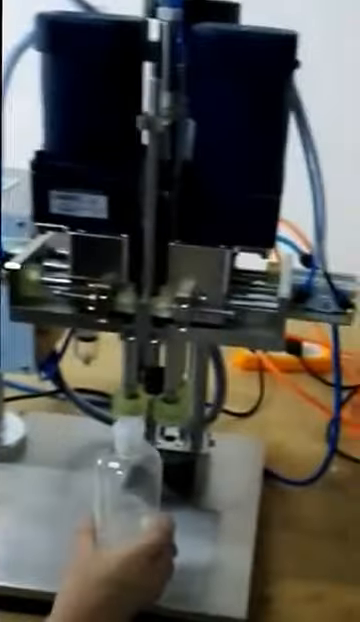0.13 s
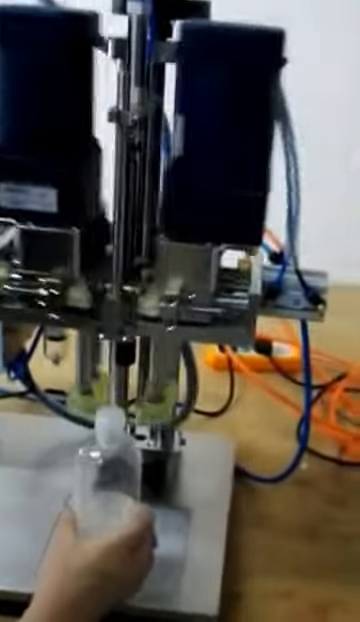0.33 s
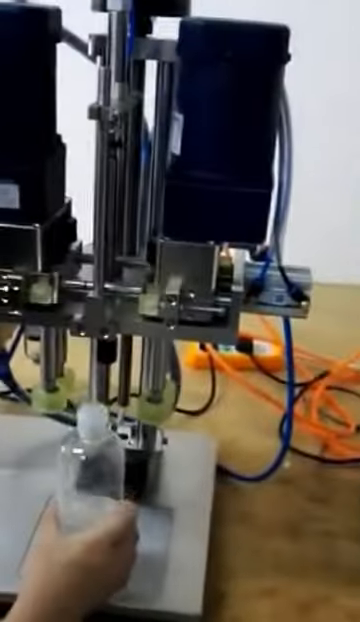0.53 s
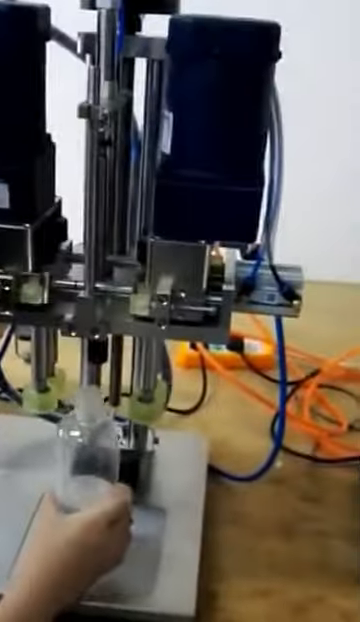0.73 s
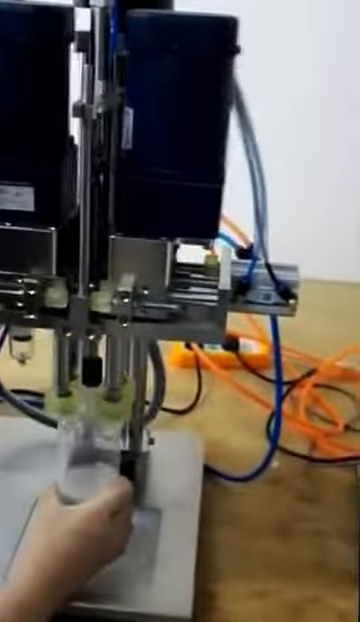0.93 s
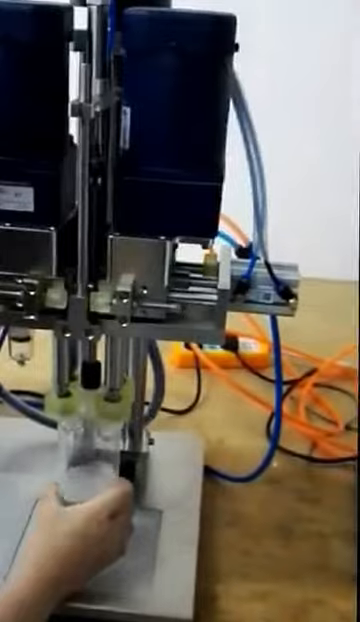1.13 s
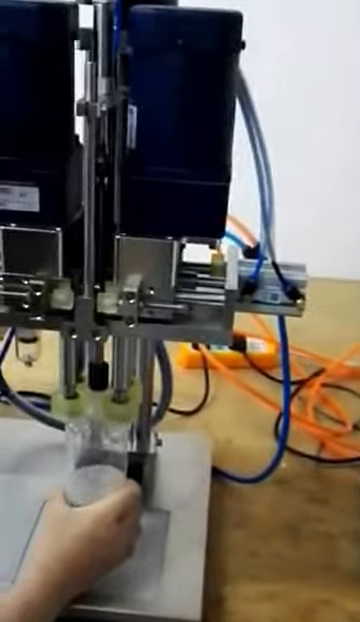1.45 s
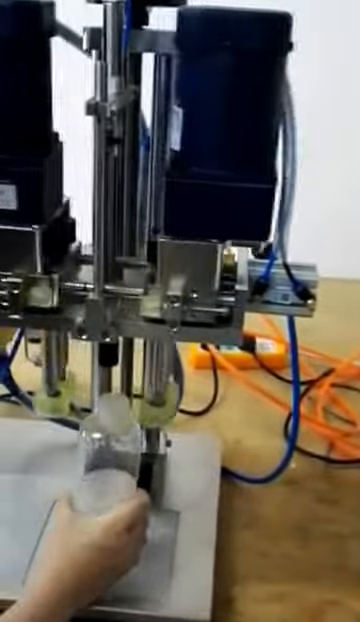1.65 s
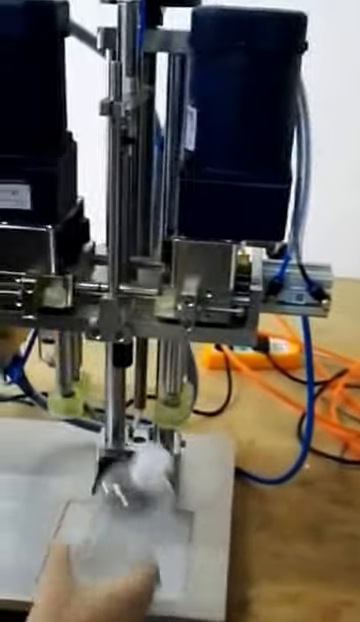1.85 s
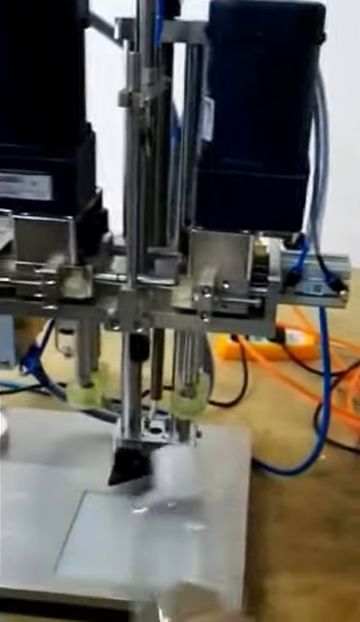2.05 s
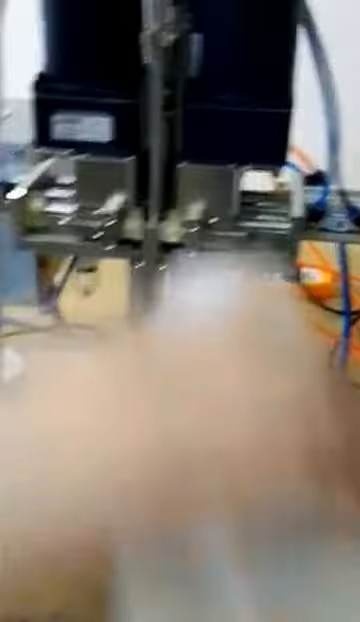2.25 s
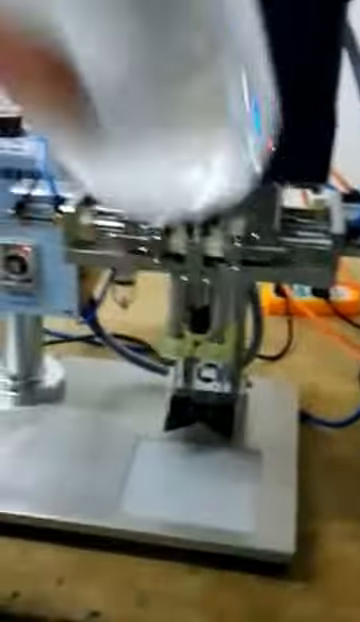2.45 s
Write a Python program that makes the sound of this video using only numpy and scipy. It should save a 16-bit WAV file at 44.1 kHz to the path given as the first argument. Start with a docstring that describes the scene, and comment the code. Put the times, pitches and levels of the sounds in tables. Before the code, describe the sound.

A pneumatic capper fires abrupt air bursts and rattling metal knocks, pauses briefly, clacks hardest around the middle, then hisses and knocks again several times; low workshop noise and short room echo behind, close microphones.

```python
"""Bursts of escaping air lead a benchtop pneumatic capper running one cycle in a hard-walled workshop.
Each burst is shaped fizz and rush noise; cylinder knocks mix noise blows with ringing housing and steel
modes, and shake the bench into low booms. Small parts click as brief noise, and slides ring as tone pairs.
Behind them lie noise din and rattle, deep rumble and thin motor tones. The left microphone is muffled
and slightly late."""
import sys
import numpy as np
from scipy import signal
from scipy.fft import rfft, irfft
from scipy.io import wavfile
from scipy.ndimage import uniform_filter1d

SR = 44100
rng = np.random.default_rng(int(sys.argv[2]) if len(sys.argv) > 2 else 0)


def generate_wav(signal):
    """Clip the signal to [-1, 1] and save it as 16-bit WAV at the path in sys.argv[1]."""
    frames = np.transpose(np.atleast_2d(signal))
    scaled = np.clip(frames, -1, 1) * 32767
    pcm = np.round(scaled).astype(np.int16)
    wavfile.write(sys.argv[1], SR, pcm)


N = 114660  # samples

# All levels are those of a layer before the mix; spectra only set the balance within a noise.
# Motor tones: [f/Hz, level/dB]
HUM_TONES = [(1500, -65), (1658, -60)]
HUM_WANDER, HUM_SWELL_DB = 0.006, 2.5  # rms pitch drift as a fraction, rms level drift

# Deep rumble over time: [t/s, level/dB]
RUMBLE_LEVEL = [(0, -69), (.3, -83), (.48, -53), (.65, -50.5), (.77, -61), (1, -64), (1.13, -45),
                (1.25, -45), (1.38, -52.5), (1.77, -70), (1.85, -46.5), (1.93, -74), (2.03, -46.5),
                (2.25, -62), (2.42, -51), (2.6, -71)]
# Rumble spectrum: [f/Hz, level/dB]
RUMBLE_SPECTRUM = [(15, -41), (30, -30), (45, -6), (67, 3.5), (85, -21), (130, 1), (400, -46), (4000, -90)]

# Workshop din over time: [t/s, level/dB]
DIN_LEVEL = [(0, -36.5), (.05, -45.5), (.12, -51), (.2, -41), (.55, -37), (.66, -41), (0.822, -46),
             (1, -34.5), (1.36, -36.5), (1.501, -41), (1.8, -39), (2.098, -39.5), (2.42, -35),
             (2.52, -41.5), (2.6, -39.5)]
# Din spectrum: [f/Hz, level/dB]
DIN_SPECTRUM = [(20, -20), (40, -27), (65, -64), (88, -10), (130, -8), (180, -3), (225, 4.5), (280, 1),
                (360, -0.5), (580, -1.5), (800, 1), (1150, -4.5), (1600, -1), (2300, -1.5), (3000, -4.5),
                (3600, -7), (4100, -12), (5000, -11), (6500, -20), (9000, -12), (12000, -29)]
RATTLES_PER_S, RATTLE_DB, RATTLE_SPREAD_DB = 70, -9.5, 0.5  # rattle level is relative to the din noise

# Workshop echo decay: [f/Hz, t60/s]
ROOM_DECAY = [(100, 0.57), (300, 0.26), (900, 0.34), (2000, 0.45), (8000, 0.41), (12000, 0.23)]
AIR_WET_DB, KNOCK_WET_DB, CLICK_WET_DB = -3.5, -5, -10  # echo sends

# Cylinder knocks: [t/s, bench thud level/dB, clonk level/dB, clonk centre f/Hz,
#                   housing ring length factor, steel clank level/dB]
CYLINDER_KNOCKS = [(0.206, -43.5, -26, 716, 0.39, -32.5), (.301, -32.5, -29.5, 910, 0.65, -23),
                   (.333, -35, -29.5, 760, 0.63, -33), (.352, -32.5, -35, 780, 1.2, -19),
                   (0.428, -31.5, -26, 930, 0.7, -29), (.903, -47, -31.5, 784, 0.74, -26.5),
                   (1.037, -41, -23.5, 660, 0.38, -29.5), (1.114, -30, -16, 810, 0.79, -18),
                   (1.142, -41, -30, 860, 0.53, -26.5), (1.162, -24, -28, 760, 0.79, -22),
                   (1.2, -28.5, -28.5, 780, 0.58, -27), (1.567, -44, -23.5, 880, 0.41, -28.5),
                   (1.658, -33.5, -28.5, 920, 1.2, -23.5), (1.866, -34.5, -22, 704, 0.34, -27.5),
                   (1.963, -40, -28.5, 784, 1.56, -18.5), (2.017, -27, -25, 790, 0.45, -16),
                   (2.145, -76, -25.5, 765, 0.38, -41), (2.249, -42.5, -33, 865, 1.4, -26),
                   (2.309, -31, -42, 800, 0.75, -30)]
# Bench modes: [f/Hz, level/dB, t60/s]
BENCH_MODES = [(128, -16, 0.88), (216.5, -2.5, 0.68), (271.4, 0, 0.63), (403, -16, 0.77)]
# Bench thud spectrum: [f/Hz, level/dB]
THUD_SPECTRUM = [(25, -48), (65, -28), (88, -23), (125, 3.5), (175, -5), (220, 7.5), (280, -2.5),
                 (350, -13.5), (600, -7), (1200, -18), (8000, -91)]
THUD_T60, THUD_RISE_S, BENCH_RING_DB, BENCH_NOISE_DB = 0.63, 0.0049, -7, -6.5
# Cylinder housing modes: [f/Hz, level/dB, t60/s]
HOUSING_MODES = [(464, -13, 0.16), (656.6, -2.5, 0.11), (726, -3, 0.15), (817, 1, 0.074), (867, 0, 0.11),
                 (919.6, -1.5, 0.13), (990, 2.5, 0.14), (1230, -16, .09), (1330, 11, 0.17)]
# Hollow clonk spectrum: [f/Hz, level/dB]
CLONK_SPECTRUM = [(150, -51), (400, 3), (570, 9.5), (710, 0.5), (950, 12.5), (1100, 3.5), (1350, -8),
                  (1700, -4), (3000, -43), (12000, -50)]
CLONK_T60, CLONK_RISE_S, HOUSING_RING_DB = 0.12, 0.0021, 9
CLONK_WIDTH = 0.087  # log-frequency distance over which the housing modes lose 6 dB
# Steel frame and loose part modes: [f/Hz, level/dB, t60/s]
STEEL_MODES = [(1135, -0.5, 0.077), (1410, -0.5, 0.3), (1589, 3.5, 0.084), (1880, 4.5, 0.041),
               (3360, -4, 0.025)]
# Steel clank spectrum: [f/Hz, level/dB]
CLANK_SPECTRUM = [(150, -15), (600, -15), (1100, -8), (1450, 8), (1900, 6.5), (2500, 6.5), (3100, -7.5),
                  (5000, 0.5), (12000, -17)]
CLANK_T60, CLANK_RISE_S, CLANK_CHATTER_S, STEEL_RING_DB = 0.073, 0.00038, 0.015, -9.5

# Struck slides: [t/s, upper tone f/Hz, level/dB, t60/s]
SLIDE_HITS = [(0.205, 1237, -23.5, 0.064), (.352, 1863, -24, .14), (.428, 925, -38, 0.24),
              (.574, 1410, -36, 0.25), (1.66, 864, -34, .36), (1.774, 1390, -36, 0.31),
              (1.868, 1256, -28.5, 0.18)]
PAIR_RATIO, PAIR_DB, SLIDE_RISE_S = 0.72, -7.5, 0.0036  # second tone: pitch ratio and relative level

# Clicks of small parts: [t/s, level/dB, part resonance f/Hz]
PART_CLICKS = [(.351, -11.5, 5650), (.572, -27, 3480), (.769, -32.5, 1690), (.859, -28, 3450),
               (0.888, -22, 6500), (.981, -14.5, 2690), (1.061, -19, 2240), (1.152, -31, 1400),
               (1.178, -27, 1800), (1.224, -23, 1250), (1.336, -42, 1810), (1.774, -27, 1820),
               (2.016, -14, 4700), (2.139, -31, 4220), (2.365, -31.5, 2740), (2.435, -32, 2400)]
# Click spectrum: [f/Hz, level/dB]
CLICK_SPECTRUM = [(200, -41), (1200, -23), (1900, 4), (3000, 0.5), (4000, -3), (5500, -3.5), (8000, -3),
                  (12000, -7.5)]
CLICK_T60, PART_T60, PART_DB = 0.05, 0.074, -6
PART_WIDTH = 0.2  # the part's noise is 30 dB down at twice this fraction away from its resonance

# Air exhausts: [t/s, length/s, fizz level/dB, rush level/dB, level sag/(dB/s)]
AIR_EXHAUSTS = [(0.201, 0.12, -21, -26, 5), (0.329, 0.079, -16.5, -24.5, 55), (0.49, 0.078, -38, -37.5, 20),
                (0.868, 0.072, -53, -38.5, 30), (0.894, 0.16, -20, -24.5, 57), (1.044, 0.13, -20, -29, 15),
                (1.242, 0.07, -49, -61, 77), (1.521, 0.071, -45.5, -50, 11), (1.568, 0.1, -15.5, -26, 92),
                (1.684, 0.11, -34, -36.5, 19), (1.867, 0.091, -19, -25.5, -9), (1.98, 0.063, -22, -24, 7),
                (2.133, 0.072, -21, -28, 13), (2.215, 0.093, -24.5, -30, 76)]
# High fizz spectrum of the jet: [f/Hz, level/dB]
FIZZ_SPECTRUM = [(100, -56), (3000, -13.5), (6000, -13.5), (7300, -5), (8200, -0.5), (9100, 2),
                 (10000, 0.5), (10900, -3.5), (11700, -10.5), (13000, -31)]
# Broad rush spectrum of the jet: [f/Hz, level/dB]
RUSH_SPECTRUM = [(60, -25), (300, -11), (800, -4), (1500, 1.5), (2400, 2.5), (3000, 0), (3500, 3.5),
                 (4000, 8), (4800, -0.5), (6200, 4), (8000, 2.5), (13000, -12)]
VALVE_OPEN_S, VALVE_SHUT_S, FLUTTER = 0.012, 0.02, 0.048  # rise, closing time constant, rms flutter
# Colour that the frame gives to the escaping air: [f/Hz, gain/dB]
FRAME_COLOUR = [(3050, -1), (3500, 3), (3980, -9), (4400, 2.5), (6600, 1), (7250, -4), (7800, -0.5)]
TURBULENCE_DB = 1.8  # rms of the random patches
# First bounces of the air off nearby surfaces: [delay t/s, level/dB]
AIR_BOUNCES = [(.00085, -23.5), (.0023, -13), (.0047, -15)]

MUFFLE_HZ, LEFT_LATE_S = 310, 0.000522  # left microphone
EDGE_HZ = 11950  # upper band limit


def amp(db):
    """Turns decibels into gain."""
    return 10 ** (np.asarray(db) / 20)


def unit(x):
    """Scales a signal to rms 1."""
    return x / np.sqrt(np.mean(x ** 2) + 1e-20)


def read(points, hz):
    """Reads a table along a log-frequency axis."""
    f, value = np.transpose(points)
    return np.interp(np.log(hz + 1), np.log(f + 1), value)


def level_over_time(points):
    """Draws a gain curve through points of time and decibels."""
    return amp(np.interp(np.arange(N) / SR, *np.transpose(points)))


def seconds(length):
    """Time axis for a sound of this length in seconds."""
    return np.arange(int(length * SR)) / SR


def add(mix, start, sound):
    """Mixes a sound in at a start time in seconds, cut off where the mix ends."""
    part = mix[round(start * SR):][:len(sound)]
    part += sound[:len(part)]


def smooth_random(shape, size):
    """Slow random drift of rms 1, smoothed over a number of samples."""
    return unit(uniform_filter1d(rng.standard_normal(shape), size=size))


def noise(spectrum, size):
    """Random-phase noise of rms 1 with the given spectrum."""
    gain = amp(read(spectrum, np.fft.rfftfreq(size, 1 / SR)))
    phase = 2 * np.pi * rng.random(len(gain))
    return unit(irfft(gain * np.exp(1j * phase), size))


def fade(t, t60):
    """Exponential decay of 60 dB in t60."""
    return np.exp(-np.log(1000) * t / t60)


def ring(modes, t):
    """Dying sines of a struck object, scaled by their combined rms before decay."""
    out, power = np.zeros(len(t)), 0
    for k, (hz, db, t60) in enumerate(modes):
        sign = (-1) ** k  # neighbouring modes start in opposite directions
        out += sign * amp(db) * fade(t, t60) * np.sin(2 * np.pi * hz * t)
        power += amp(db) ** 2 / 2
    return out / np.sqrt(power)


def room(x):
    """The workshop's echo: a noise tail whose bands die at their own speeds."""
    hz, t, bands = signal.stft(rng.standard_normal(SR), SR, nperseg=256)
    t60 = read(ROOM_DECAY, hz)[:, None]
    tail = signal.istft(bands * fade(t, t60), SR, nperseg=256)[1]
    tail *= np.clip(np.arange(len(tail)) / SR / 0.0038, 0, 1) ** 2  # soft onset over 3.8 ms
    return signal.fftconvolve(x, tail / np.linalg.norm(tail))[:N]


def hum():
    """Thin motor tones that waver a little in pitch and level."""
    out = np.zeros(N)
    for hz, db in HUM_TONES:
        # each drift is scaled to rms 1 on its own
        wander, swell = smooth_drifts = np.array([smooth_random(N, 4000), smooth_random(N, 4000)])
        phase = 2 * np.pi * np.cumsum(hz * (1 + HUM_WANDER * wander)) / SR
        out += amp(db + HUM_SWELL_DB * swell) * np.sqrt(2) * np.sin(phase)
    return out


def rumble():
    """Low-frequency noise that swells and sinks slowly."""
    return level_over_time(RUMBLE_LEVEL) * noise(RUMBLE_SPECTRUM, N)


def rattle():
    """Loose steel parts are tapped at random, each tap exciting steel modes and clank noise."""
    struck = rng.random(N) < RATTLES_PER_S / SR
    taps = amp(RATTLE_SPREAD_DB * rng.standard_normal(N)) * struck
    t = seconds(0.2)
    tap_sound = ring(STEEL_MODES, t) + noise(CLANK_SPECTRUM, len(t)) * fade(t, CLICK_T60)
    return unit(signal.oaconvolve(taps, tap_sound)[:N])


def workshop():
    """A dull, uneven noise din of machinery with a light rattle in it."""
    uneven = amp(0.8 * smooth_random(N, 500))
    din = noise(DIN_SPECTRUM, N) + amp(RATTLE_DB) * rattle()
    return level_over_time(DIN_LEVEL) * uneven * din


def bench():
    """Every knock shakes the bench, which booms in its low modes with a dull noise thud."""
    out, t = np.zeros(N), seconds(1)
    rise = np.minimum(t / THUD_RISE_S, 1)
    for start, thud_db, *_ in CYLINDER_KNOCKS:
        thud = amp(BENCH_NOISE_DB) * noise(THUD_SPECTRUM, len(t)) * fade(t, THUD_T60)
        boom = amp(BENCH_RING_DB) * ring(BENCH_MODES, t)
        add(out, start, amp(thud_db) * (thud + boom) * rise)
    return out


def slides():
    """Struck slides ring on in two tones that die away together, the second one lower and softer."""
    out, t = np.zeros(N), seconds(0.5)
    rise = np.minimum(t / SLIDE_RISE_S, 1)
    for start, hz, db, t60 in SLIDE_HITS:
        pair = ring([(hz, 0, t60), (hz * PAIR_RATIO, PAIR_DB, t60)], t)
        add(out, start, amp(db) * pair * rise)
    return out


def clicks():
    """Sharp metal contacts: a noise click plus narrow noise at the resonance of the part hit."""
    out, t = np.zeros(N), seconds(0.1)
    stretch = 1 + 2 * PART_WIDTH
    for start, db, hz in PART_CLICKS:
        contact = noise(CLICK_SPECTRUM, len(t)) * fade(t, CLICK_T60)
        part = noise([(hz / stretch, -30), (hz, 0), (hz * stretch, -30)], len(t)) * fade(t, PART_T60)
        add(out, start, amp(db) * (contact + amp(PART_DB) * part))
    return out


def clonk(centre_hz, stretch, t):
    """A short hollow blow; where it lands decides which housing modes ring, and how long."""
    modes = []
    for hz, db, t60 in HOUSING_MODES:
        off_centre_db = 6 * abs(np.log(hz / centre_hz)) / CLONK_WIDTH
        modes.append((hz, db - off_centre_db, t60 * stretch))
    blow = noise(CLONK_SPECTRUM, len(t)) * fade(t, CLONK_T60)
    blow += amp(HOUSING_RING_DB) * ring(modes, t)
    return blow * np.minimum(t / CLONK_RISE_S, 1) / np.sqrt(2)


def clank(t):
    """The steel frame chatters at full level for a moment, then fades while its modes ring."""
    chatter = noise(CLANK_SPECTRUM, len(t)) * fade(np.maximum(t - CLANK_CHATTER_S, 0), CLANK_T60)
    return (chatter + amp(STEEL_RING_DB) * ring(STEEL_MODES, t)) * np.minimum(t / CLANK_RISE_S, 1)


def knocks():
    """A piston meets its stop: the housing clonks and the steel frame clanks."""
    out, t = np.zeros(N), seconds(0.5)
    for start, _, clonk_db, hz, stretch, clank_db in CYLINDER_KNOCKS:
        knock = amp(clonk_db) * clonk(hz, stretch, t) + amp(clank_db) * clank(t)
        add(out, start, knock / np.sqrt(2))
    return out


def reflected(x):
    """Adds the first bounces off the bench, the frame and the wall as delayed copies."""
    out = x.copy()
    for delay, db in AIR_BOUNCES:
        add(out, delay, amp(db) * x)
    return out


def turbulent(x):
    """The jet takes the colour of the frame and shifts from moment to moment in random patches."""
    hz, _, bands = signal.stft(x, SR, nperseg=256)
    patches = uniform_filter1d(rng.standard_normal(bands.shape), size=2, axis=0)  # across frequency
    patches = unit(uniform_filter1d(patches, size=16, axis=1))  # across time
    gain_db = read(FRAME_COLOUR, hz)[:, None] + TURBULENCE_DB * patches
    return signal.istft(bands * amp(gain_db), SR, nperseg=256)[1][:N]


def exhausts():
    """A valve opens, the jet hisses through its silencer at a drifting pressure, then dies away."""
    out, t = np.zeros(N), seconds(0.5)
    opening = np.minimum(t / VALVE_OPEN_S, 1)
    for start, length, fizz_db, rush_db, sag in AIR_EXHAUSTS:
        closing = np.exp(-np.maximum(t - length, 0) / VALVE_SHUT_S)
        flow = opening * amp(-sag * t) * closing  # a negative sag makes the pressure climb
        flutter = 1 + FLUTTER * smooth_random(len(t), 300)
        fizz = amp(fizz_db) * noise(FIZZ_SPECTRUM, len(t))
        rush = amp(rush_db) * noise(RUSH_SPECTRUM, len(t))
        add(out, start, flow * flutter * (fizz + rush))
    return out


def muffled_late(x):
    """The left microphone: a gentle one-pole treble loss and a slight delay."""
    hz = np.fft.rfftfreq(2 * N, 1 / SR)
    delay = np.exp(-2j * np.pi * hz * LEFT_LATE_S)
    muffle = 1 / (1 + 1j * hz / MUFFLE_HZ)
    return irfft(rfft(x, 2 * N) * delay * muffle)[:N]


def scene():
    """The machine in its room at two microphones, each with its own echo of the air."""
    air, blows, ticks = reflected(turbulent(exhausts())), knocks(), clicks()
    echo = room(amp(KNOCK_WET_DB) * blows + amp(CLICK_WET_DB) * ticks)
    background = hum() + rumble() + workshop()
    shared = background + bench() + slides() + ticks + blows + air + echo
    left = shared + amp(AIR_WET_DB) * room(air)
    right = shared + amp(AIR_WET_DB) * room(air)
    return np.array([muffled_late(left), right])


def record(dry):
    """Rounds the loudest peaks off softly, then cuts the treble above the band limit."""
    rounded = dry / (1 + (dry / 0.75) ** 6) ** (1 / 6)
    low_pass = signal.firwin(401, EDGE_HZ, window=("kaiser", 9), fs=SR)
    return signal.oaconvolve(rounded, low_pass[None], "same")


dry = scene()
out = record(dry)
generate_wav(out)
```